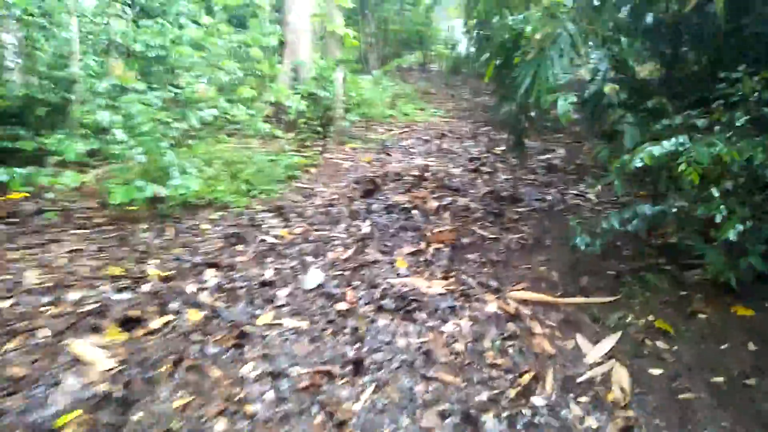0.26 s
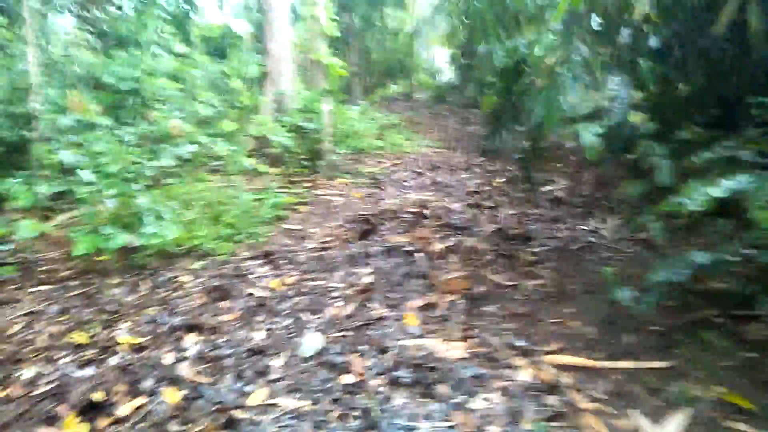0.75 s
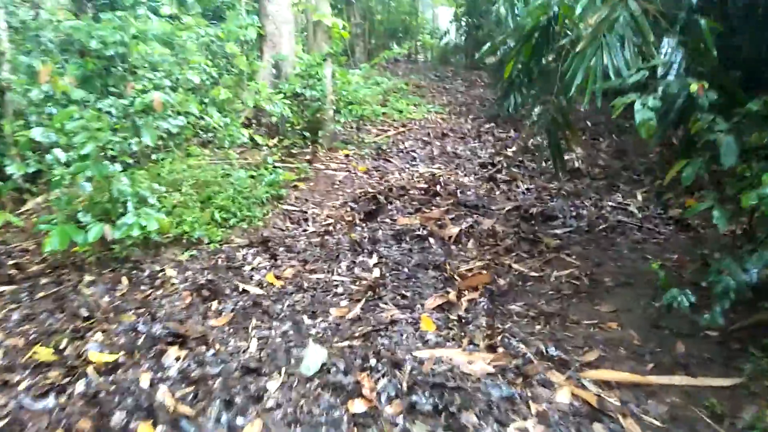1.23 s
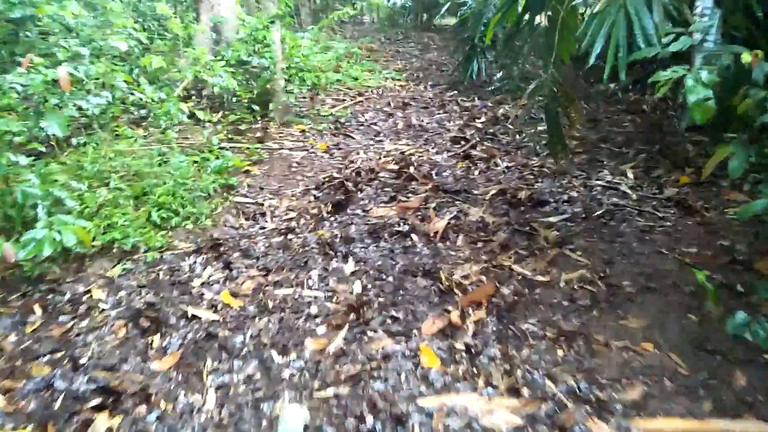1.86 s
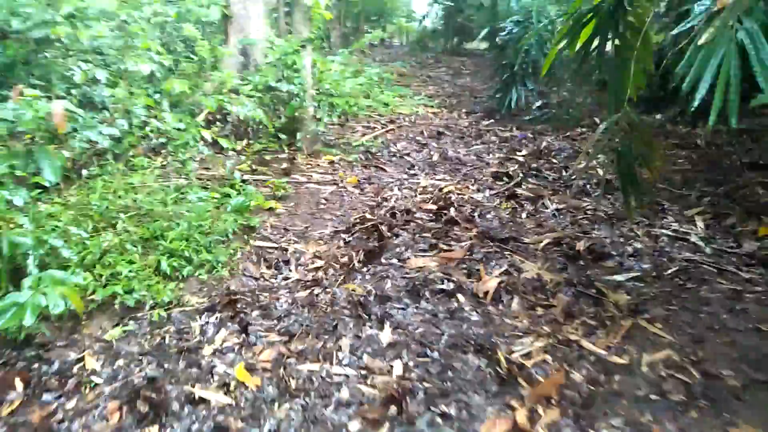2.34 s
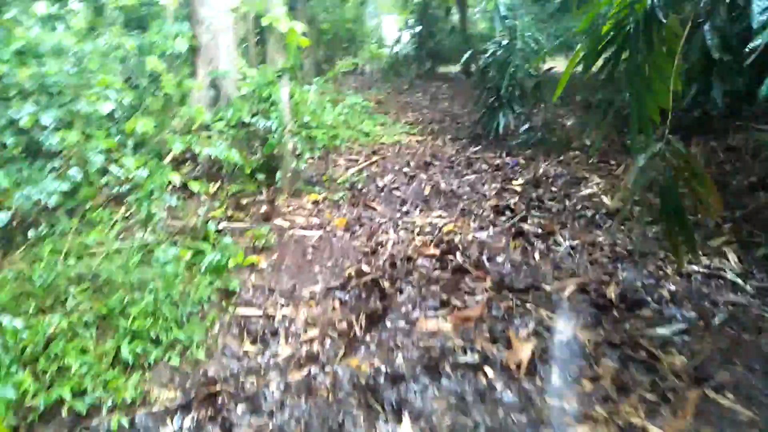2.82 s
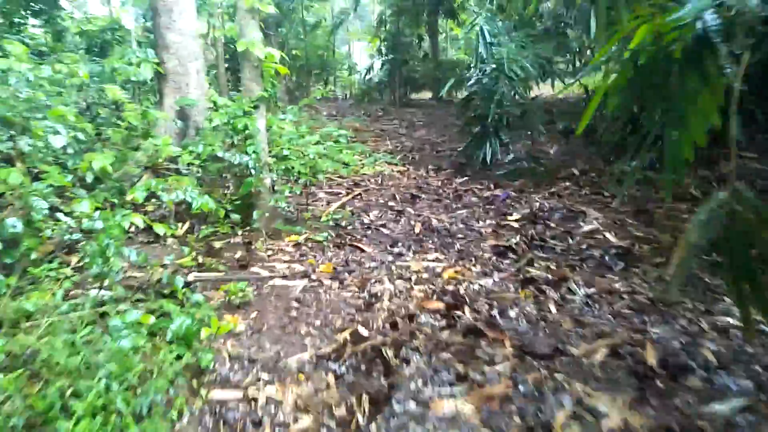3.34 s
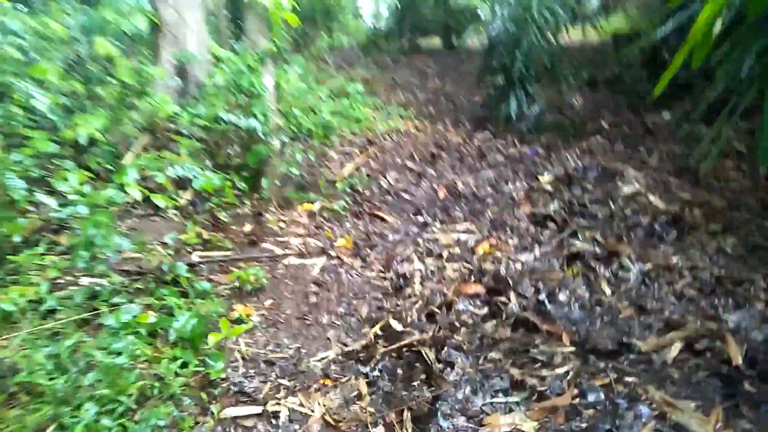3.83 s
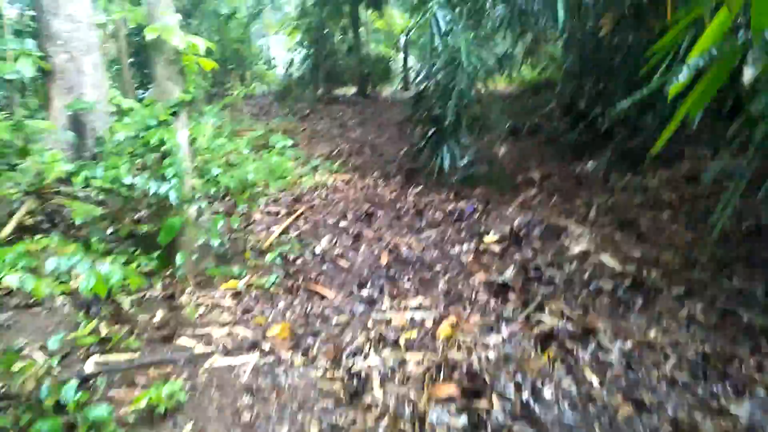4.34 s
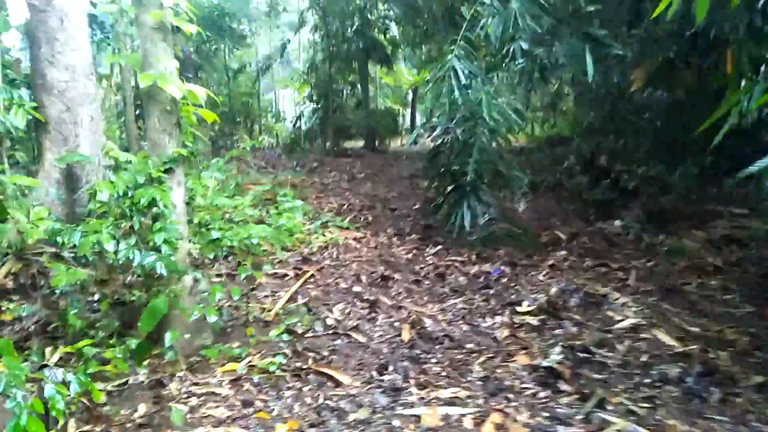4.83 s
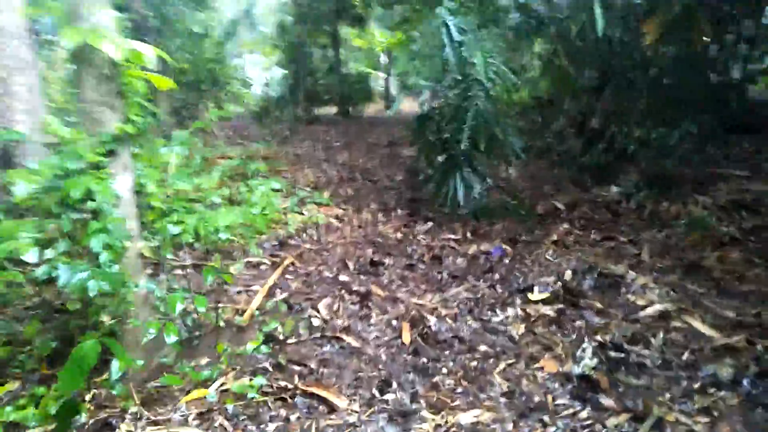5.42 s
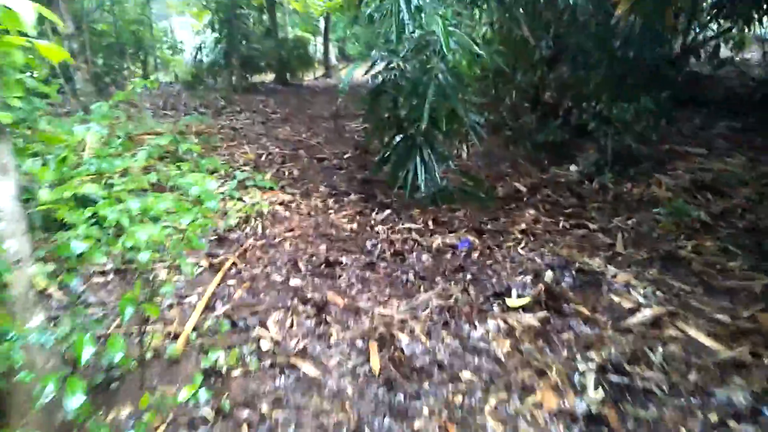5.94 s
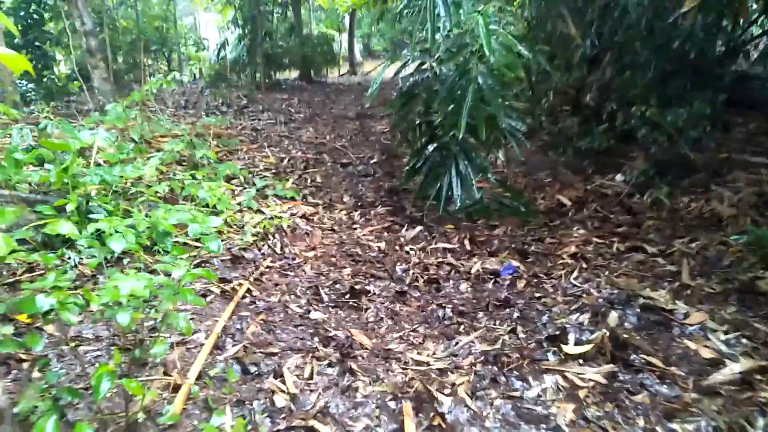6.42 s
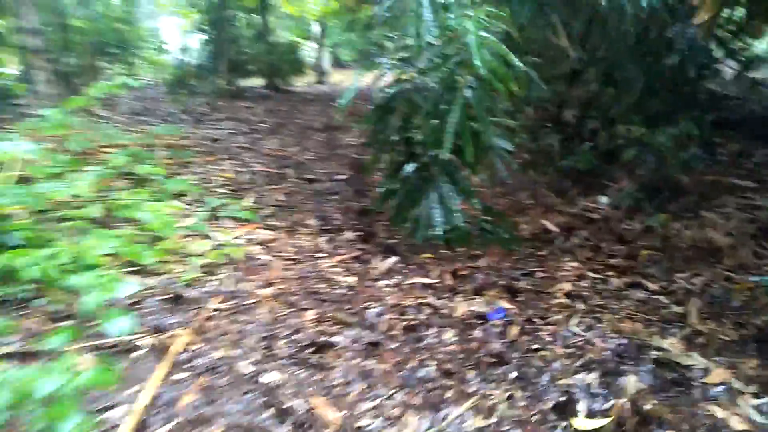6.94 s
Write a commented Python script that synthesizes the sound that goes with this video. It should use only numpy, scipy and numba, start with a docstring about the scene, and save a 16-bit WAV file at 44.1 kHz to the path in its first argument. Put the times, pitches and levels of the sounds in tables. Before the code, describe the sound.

Close, dense rain drips pop on stretched fabric above, crowded at first and sparser later, with crisp leaf snaps and soft rainfall around.

```python
"""A garden path in the rain, walked beneath a taut canopy close overhead, probably an umbrella.
Heavy drips from the trees each give a dull thud, a bright tick and a sharper crack, built from short
struck modes; their blows leave the canopy ringing as grainy noise through wandering resonances.
Fine drops patter between them as small random ticks. Rain hisses on the leaves all around as coloured
noise and tiny impacts, while the nearest leaves tap, snap and rustle."""
import sys
import numpy as np
from scipy import signal
from scipy.fft import rfft, irfft
from scipy.io import wavfile
from scipy.ndimage import uniform_filter1d, map_coordinates
from numba import njit

SR = 44100
rng = np.random.default_rng(int(sys.argv[2]) if len(sys.argv) > 2 else 0)


def materialize(psi):
    """Save the field psi as 16-bit PCM at rate SR to the path in sys.argv[1].

    A 1-D psi becomes a single channel; in a 2-D psi each row is a channel.
    """
    bounded = np.clip(np.atleast_2d(psi).T, -1, 1)
    quanta = np.round(bounded * 32767).astype(np.int16)
    wavfile.write(sys.argv[1], SR, quanta)


N = 316197

# heavy drips on the canopy: start_s, thud_hz, thud_db, tick_hz, tick_db, tick_ring_cycles, crack_db
HEAVY_DRIPS = [(0.2213, 225, -11, 2040, 4, 0.55, -6.5), (0.2373, 370, -66, 2950, -9, 0.84, -46),
               (0.311, 653, -31, 1800, -8, 1.13, -19), (0.4074, 553, -17.5, 1700, -0.5, 0.62, -29),
               (0.477, 900, -32, 2200, -12.5, 1.2, -24), (0.4996, 624, -21, 1820, 0.5, 0.57, -24),
               (0.5532, 565, -8.5, 1430, 3.5, 0.56, -3), (0.5731, 900, -18, 2100, -18, 0.79, -26),
               (0.614, 1030, -2, 2430, -5.5, 1.54, -23), (0.6644, 527, -18, 2190, -17, 3.9, -44),
               (0.7083, 760, -15, 2350, -13, 0.58, -34), (0.7913, 205, -23, 2840, -8, 0.43, -26),
               (0.9095, 950, -15, 1470, -25, 0.69, -26), (0.9145, 840, -10.5, 2850, -10.5, 0.6, -54),
               (0.9345, 784, -12, 1460, -10, 0.6, -9), (0.9844, 1320, -14, 2090, -9, 0.68, -43),
               (1.0347, 630, -13, 1750, -19, 0.85, -10.5), (1.138, 710, -14, 1790, -21, 1.5, -12),
               (1.2356, 900, -7.5, 1720, -4.5, 0.93, -17), (1.2567, 1030, -28, 2680, -10, 0.95, -12),
               (1.3418, 690, -7, 1250, -7.5, 0.6, -7.5), (1.376, 1180, -17, 2520, -10, 1.8, -26),
               (1.3863, 520, 1.5, 2400, -5, 0.56, -16), (1.4309, 640, -9.5, 2080, -6, 0.7, -10),
               (1.4604, 905, -11.5, 2170, -15, 3.1, -13), (1.4818, 770, -14, 1860, -4, 0.46, -18),
               (1.5078, 800, -29, 1980, -14, 1, -29), (1.5406, 493, -11.5, 1740, -18.5, 5.8, -38),
               (1.5914, 810, -11, 1640, 2.5, 0.53, -30), (1.6199, 1100, -47, 1800, -8, 1, -26.5),
               (1.6597, 1350, -8, 2410, -11, 0.89, -21.5), (1.6808, 1340, -30, 2220, -4, 0.81, -11),
               (1.6983, 800, -12, 1890, -18, 0.73, -14), (1.705, 596, -14.5, 2700, -12, 2, -20),
               (1.7187, 696, -10, 1780, -8.5, 1.6, -9), (1.7888, 635, -7, 1920, -1.5, 1.4, -35),
               (1.7961, 610, -22, 2480, -23, 1.5, -34), (1.8212, 620, -23, 2290, -20, 3.1, -12),
               (1.8746, 1310, -6.5, 2420, -8.5, 2.1, -36), (1.9197, 1340, -26, 2250, -17, 1.3, -30),
               (1.9598, 810, -21, 1930, -5.5, 1.1, -10), (1.9935, 695, -14.5, 1660, -5, 1.04, -14),
               (2.0112, 580, -12.5, 1700, -5, 0.77, -13), (2.0323, 805, -38, 2200, -34, 1, -19),
               (2.0447, 540, -26.5, 2530, -12.5, 1.8, -17), (2.1008, 670, -17.5, 1950, -11, 1.5, -32),
               (2.1124, 1270, -10, 2600, -10.5, 1.1, -6), (2.1365, 1100, -31, 1990, -10.5, 1.9, -18),
               (2.1463, 1360, -6, 1940, -15.5, 2.4, -16), (2.1835, 900, -38, 2110, -8, 0.8, -7),
               (2.1926, 600, -40, 1770, -5.5, 0.79, -14), (2.2156, 1340, -12, 1960, -4.5, 0.67, -11),
               (2.2434, 1120, -12, 1660, -9.5, 0.46, -30), (2.3126, 1350, -43, 2540, -3, 0.56, -36),
               (2.3649, 736, -35, 2320, -14.5, 2.6, -29), (2.4174, 900, -22, 2150, -7, 1.4, -9),
               (2.5203, 670, -17.5, 1780, -4.5, 0.58, -11), (2.5326, 630, -36, 2300, -11.5, 1.4, -14),
               (2.583, 900, -16, 2300, -9.5, 0.94, -24), (2.6015, 566, -20.5, 2400, -10, 1.3, -37),
               (2.6605, 497, -16.5, 2500, 0, 0.63, -34), (2.679, 720, -8.5, 1600, -0.5, 0.85, -36),
               (2.7407, 590, -6, 1890, -0.5, 1.03, -40), (2.8257, 820, -39, 2520, -5, 0.71, -40),
               (2.8705, 840, 1.5, 2170, -7, 2, -19), (2.8795, 393, -16, 1660, -7, 0.37, -28),
               (2.9043, 735, -9, 2100, -10.5, 2.5, -16), (2.916, 537, -7.5, 1210, -9, 0.68, -34),
               (2.9331, 800, -15, 1900, -19, 1, -42), (2.978, 1030, -10.5, 2350, -3.5, 0.7, -37),
               (2.9915, 980, -22, 2070, -5, 0.87, -32), (3.0635, 980, -22, 3180, -9.5, 1.5, -14),
               (3.1046, 1000, -13, 2500, -10, 1.1, -9), (3.1407, 910, -12.5, 2130, -11, 0.99, -25),
               (3.1465, 510, -10.5, 1670, 3, 0.92, -3), (3.1744, 890, -27, 2300, -24, 0.9, -32),
               (3.2007, 443, -29, 1680, -18, 2.2, -14), (3.2256, 716, -15.5, 1380, -8, 0.85, -30),
               (3.2638, 630, -4.5, 1480, 1, 0.78, -32), (3.4272, 554, -11.5, 1850, -4, 0.82, -10),
               (3.4484, 854, -14, 1970, -4.5, 0.62, -19), (3.5, 546, -17.5, 1900, -18, 2, -18),
               (3.5954, 283, -15.5, 2210, -9.5, 3.3, -55), (3.6853, 335, -10.5, 1890, -9.5, 1.3, -11.5),
               (3.71, 543, -19, 2260, -14.5, 1.7, -37), (3.77, 816, -22, 2290, -9.5, 1.65, -39),
               (3.8618, 650, -53, 1940, -11, 1.8, -26), (3.8965, 616, -5.0, 2310, -0.5, 0.5, -50),
               (4.0906, 474, -13, 1540, -5, 0.8, -41.5), (4.1244, 430, -5.5, 1350, 3, 0.57, -5),
               (4.1413, 590, -38, 1190, -17, 0.83, -39), (4.1534, 1340, -16, 2140, -23, 1.9, -33),
               (4.1895, 465, -6.5, 1850, 0.5, 1.1, -49), (4.269, 444, -14.5, 2350, -11, 1.66, -13),
               (4.4254, 710, -13, 1410, -12, 0.69, -30), (4.5439, 710, -18, 1640, -19, 2.5, -15),
               (4.6242, 434, -15, 2100, -11, 1.9, -37), (4.6977, 620, -21, 1630, -12, 1.07, -21),
               (4.7268, 1270, -18, 2000, -18, 1.2, -18), (4.8093, 630, -29, 1830, -8, 0.92, -15),
               (4.85, 623, -14, 1760, -32, 1.4, -17.5), (4.8608, 530, -15.5, 1450, -18, 0.77, -18),
               (4.8724, 402, -22.5, 1950, -28, 0.7, -25), (4.9289, 670, -17.5, 1510, -11, 1.37, -37),
               (4.9467, 1400, -12, 2300, -21.5, 5.6, -18), (5.0802, 760, -8.5, 1460, -14, 1.5, -25),
               (5.0988, 620, -18, 1290, -10, 0.43, -21), (5.1258, 950, -16, 2230, -9, 1.5, -29),
               (5.374, 407, -15.5, 1840, -69, 0.6, -26), (5.405, 650, -17.5, 2280, -50, 1.2, -39),
               (5.769, 1340, -48, 2730, 0, 0.46, -43), (5.824, 610, -16.5, 2460, -7.5, 1.3, -40),
               (5.8415, 690, -24, 2000, -4, 0.6, -40), (5.9023, 587, -18.5, 1900, -4.5, 1.1, -22),
               (5.9068, 470, -17.5, 1940, -6.5, 1.46, -11), (5.9295, 445, -13, 2000, -7, 0.99, -17),
               (5.9731, 610, -21, 2300, -12, 2.1, -14), (6.126, 780, -11.5, 1970, -5, 1.74, -7),
               (6.2201, 645, -8.5, 1390, -11, 0.84, -25), (6.2236, 504, -9.5, 1220, 1.5, 0.53, -12),
               (6.3071, 1350, -2.5, 2300, -10, 4, -24), (6.3601, 716, -20, 1440, -8, 1.1, -13),
               (6.443, 730, -21, 1860, -11, 1.3, -32), (6.4541, 1320, -10, 2770, -22, 7.4, -12.5),
               (6.6697, 330, -14, 2060, 2, 0.91, -5.5), (6.7285, 700, -40, 2290, -10, 1, -20),
               (6.7523, 313, -14, 3050, 2, 0.56, -45), (6.9901, 359, -6, 2370, -1, 2.2, -17),
               (7.0032, 560, -12.5, 2350, -13, 0.98, -33), (7.0204, 600, -16, 2100, -9, 0.8, -24),
               (7.0233, 398, -8.5, 2120, 4, 0.81, -19), (7.0532, 800, -22, 2190, -8, 0.58, -21),
               (7.0793, 430, -4, 1840, -1.5, 0.95, -25), (7.122, 602, -17.5, 1850, -20.5, 2.4, -29)]
# fine patter, thick under the tree crowns and thin in the gap between them: time_s, relative_level_db
PATTER_COVER = [(0.0, -37), (0.46, -34.5), (1.2, -36), (1.45, -31.5), (2.2, -35), (2.45, -34.5),
                (2.85, -34.5), (3.5, -38), (4.6, -41), (5.9, -38.5), (6.2, -32.5), (6.6, -34),
                (7.17, -37.5)]
# rain on the leaves; the bushes stand back in the middle of the path: time_s, relative_level_db
BUSH_COVER = [(0, -39), (1.1, -41.5), (1.5, -40), (2.1, -40), (2.8, -38), (3.3, -42), (3.9, -41),
              (4.5, -43.5), (5, -40.5), (5.8, -39.5), (6.3, -39), (7.17, -38.5)]
# each leaf and panel has its own tuning: typical drift as a share of the pitch
WANDER = 0.011


def undb(db):
    """Decibels to gain."""
    return 10 ** (np.asarray(db) / 20)


def unit(x):
    """Scale to rms 1."""
    return x / np.sqrt(np.mean(x ** 2))


def add(out, s, sound):
    """Mix a sound in at time s."""
    i = int(np.clip(s * SR, 0, N - 1))
    out[i:i + len(sound)] += sound[:len(out) - i]


def along(curve):
    """A (time_s, level_db) curve, sample by sample."""
    return np.interp(np.arange(N) / SR, *np.transpose(curve))


def colour(x, points):
    """Causal minimum-phase filter through (hz, db) points, built from the cepstrum."""
    size = 2048
    hz, db = np.transpose(points)
    bins_hz = np.arange(size // 2 + 1) * SR / size
    gain = undb(np.interp(np.log(bins_hz + 1), np.log(hz), db))
    cepstrum = irfft(np.log(gain))
    # fold the cepstrum forward in time
    cepstrum[1:size // 2] *= 2
    cepstrum[size // 2 + 1:] = 0
    return signal.fftconvolve(x, irfft(np.exp(rfft(cepstrum))))[:N]


def soften(x, hz):
    """Take the top off a sound with a low-pass."""
    return signal.sosfilt(signal.butter(4, min(hz, SR / 3), fs=SR, output="sos"), x)


def walk(rate):
    """Slow smooth chance of rms 1, with a new target about rate times a second."""
    k = int(SR / rate)
    steps = np.repeat(rng.standard_normal(N // k + 1), k)
    return unit(uniform_filter1d(steps, k)[:N])


def wander(x, rate):
    """Let all the resonances of a steady sound drift together by bending its playing speed."""
    place = np.cumsum(1 + WANDER * walk(rate))
    return map_coordinates(x, [place], order=3, mode="mirror")


def ping(hz, cycles, rise=0.11, size=500):
    """A struck mode: the push builds over part of a cycle, and the air follows the surface's speed."""
    turns = hz * np.arange(size) / SR
    swing = np.sin(2 * np.pi * turns) * np.exp(-turns / cycles) * (1 - np.exp(-turns / rise))
    return -np.diff(swing, prepend=0) / (2 * np.pi * hz / SR)


def impacts(rate, spread_db):
    """Random tiny impacts per second: many faint, a few strong, of either sign."""
    hit = rng.random(N) < rate / SR
    size = undb(spread_db * np.minimum(rng.exponential(size=N), 5))
    return unit(hit * size * rng.choice([-1, 1], N))


def bunch(hz, spread_s, count):
    """Dry little ticks of mixed pitch, starting most thickly at spread_s and none after twice that."""
    early, late, size, pitch = rng.random((count, 4)).T[:, :, None]
    steps = np.arange(260)
    tick_hz = np.minimum(hz * 2 ** (1.4 * pitch - .7), SR / 3)
    turns = tick_hz * steps / SR
    swing = np.sin(2 * np.pi * turns) * np.exp(-turns) * (1 - np.exp(-turns / 0.21))
    ticks = size * np.diff(swing, prepend=0) / (np.pi * turns[:, 1:2])
    start = (spread_s * SR * (early + late)).astype(int)
    return np.bincount((start + steps).ravel(), ticks.ravel())


def small_drops(rate, low_hz, high_hz, spread_db, cycles=1.07):
    """Random small drops, each a dry damped tick of its own pitch; also their (time_s, level_db)."""
    when, pitch, size, damping = rng.random((int(rate * N / SR), 4)).T[:, :, None]
    db = -spread_db * np.log(size + .03)  # many faint, a few strong
    steps = np.arange(400)
    turns = low_hz * (high_hz / low_hz) ** pitch * steps / SR
    decay = np.exp(-turns / (cycles * (.5 + .5 * damping)))
    swing = np.sin(2 * np.pi * turns) * turns * decay
    ticks = undb(db) * np.diff(swing, prepend=0) / turns[:, 1:2]
    start = (when * N).astype(int)
    out = np.bincount((start + steps).ravel(), ticks.ravel(), N)[:N]
    return unit(out), np.hstack([when * N / SR, db])


def rainfall(spectrum, rate, spread_db, wash_db, flicker_db):
    """Countless drops on foliage: near ones crackle, far ones merge into a wash."""
    drops = impacts(rate, spread_db) + undb(wash_db) * rng.standard_normal(N)
    return unit(colour(drops, spectrum)) * undb(flicker_db * walk(25))


def leaf_hiss(db=4):
    """Rain on the leaves all around: a mostly merged wash whose leafy resonances drift."""
    # colour of rain on the leaves: pitch_hz, relative_density_db (per Hz)
    leaf_spectrum = [(150, 0), (400, -12.5), (600, -5.5), (950, -9.5), (1900, -7.5), (2400, 6), (2620, -2),
                     (2860, 4.5), (3150, -11), (3500, -3), (3850, 2), (4080, -5), (4600, 5), (5200, 2.5),
                     (6500, -10.5), (12000, -16.5)]
    rain = rainfall(leaf_spectrum, rate=1200, spread_db=4.0, wash_db=8.5, flicker_db=0.01)
    return undb(db + along(BUSH_COVER)) * wander(rain, rate=5)


def spray_hiss():
    """The finest spray: dense treble impacts and noise with a fast flicker in level."""
    # colour of the spray: pitch_hz, relative_density_db (per Hz)
    spray_spectrum = [(3000, -63), (6000, -14), (8500, 2.5), (10200, -19), (11600, 4), (13000, -10),
                      (15800, -7)]
    # it carries least far, so it fades most where the bushes stand back: time_s, level_db
    spray_cover = [(0, -46.5), (0.7, -48), (0.9, -45.5), (1.25, -47.5), (1.5, -44.5), (2.0, -46),
                   (2.9, -47), (3.3, -48), (3.9, -49.5), (4.4, -50), (5.0, -48), (5.35, -47.5),
                   (5.55, -44.5), (6.3, -48.5), (7.17, -44.5)]
    spray = rainfall(spray_spectrum, rate=3200, spread_db=7.0, wash_db=0.0, flicker_db=1.4)
    return undb(along(spray_cover)) * spray


def air(corner_hz=135, db=-55.0, swell_db=3.6):
    """Faint low rumble of air moving past the microphone: slowly swelling band-limited noise."""
    band = signal.butter(2, [45, corner_hz], "band", fs=SR, output="sos")
    low = signal.sosfilt(band, rng.standard_normal(N))
    return unit(low) * undb(db + swell_db * walk(1.3))


@njit
def resonate(x, hz, width):
    """A band-pass resonance (state-variable filter) whose centre moves from sample to sample."""
    y, band, low = np.empty(len(x)), 0., 0.
    for i in range(len(x)):
        g, k = np.tan(np.pi * hz[i] / SR), width / hz[i]
        v = (band + g * (x[i] - low)) / (1 + g * (g + k))
        band, low, y[i] = 2 * v - band, low + 2 * g * v, k * v
    return y


def canopy(kicks, t60, scatter_db, low_hz=380, high_hz=4600):
    """The canopy rings after (time_s, level_db) kicks, each shared differently among its resonances."""
    # canopy resonances: pitch_hz, width_hz, relative_level_db
    resonances = [(600, 153, -1), (1275, 310, 0), (1535, 77, 2.5), (1866, 45, 3.5), (2271, 85, 9.5),
                  (2460, 41, 4.5), (2848, 42, -4), (3326, 27, -8), (3500, 190, -11.5)]
    patchy_db = 1.9  # typical swell and fade of each resonance
    crunch_db, crunch_width = -5.5, 0.23  # level against the ring; width as a share of the pitch
    s, db = np.transpose(kicks)
    where = np.clip(s * SR, 0, N - 1).astype(int)
    # each kick lands elsewhere
    chance = 2 * rng.random((len(s), len(resonances))) - 1
    shares = undb(np.transpose(resonances)[2] + scatter_db * chance)
    shares = shares / np.linalg.norm(shares, axis=1, keepdims=True)
    # scattered water keeps the ring grainy; the larger droplets also crunch dryly on the fabric
    grain = impacts(rate=1100, spread_db=2.5)
    droplets = impacts(rate=170, spread_db=0.5)
    fade = np.exp(-2 * np.log(1000) / (t60 * SR))
    out = 0
    for (hz, width, _), share in zip(resonances, shares.T):
        power = np.bincount(where, (undb(db) * share) ** 2, N)
        energy = signal.lfilter([1], [1, -fade], power + 1e-18)
        centre = hz * (1 + WANDER * walk(3.6))
        ring = unit(resonate(grain, centre, float(width)) * undb(patchy_db * walk(3)))
        crunch = unit(resonate(droplets * rng.standard_normal(N), centre, float(crunch_width * hz)))
        # neighbouring modes swing against each other
        out = np.sqrt(energy) * (ring + undb(crunch_db) * crunch) - out
    return signal.sosfilt(signal.butter(3, [low_hz, high_hz], "band", fs=SR, output="sos"), out)


def patter(tick_db=-4.0, ring_db=-2.0):
    """Fine drops on the canopy, and the ring they keep alive."""
    ticks, kicks = small_drops(rate=240, low_hz=1247, high_hz=3400, spread_db=5.0)
    return undb(tick_db) * ticks + undb(ring_db) * unit(canopy(kicks, t60=0.18, scatter_db=5.5))


def leaf_crackle(db=-8):
    """Many fine, separate ticks from the bushes along the path."""
    ticks, _ = small_drops(rate=440, low_hz=1900, high_hz=5050, spread_db=4.5, cycles=2.5)
    return undb(db + along(BUSH_COVER)) * soften(ticks, hz=5900)


def leaf_taps(rate=24, low_hz=3000, high_hz=5200, cycles=5.6, db=-31, spread_db=5):
    """Single drops on stiff wet leaves close by, each a dry tick of its own pitch."""
    out = np.zeros(N)
    for when, pitch, size in rng.random((int(rate * N / SR), 3)):
        tap_db = db + spread_db * (2 * size - 2.5)  # half to two and a half spreads below db
        add(out, when * N / SR, undb(tap_db) * ping(low_hz * (high_hz / low_hz) ** pitch, cycles))
    return out


def litter_drops(db=-58):
    """Sparse low ticks of drops on the litter below."""
    ticks, _ = small_drops(rate=34, low_hz=464, high_hz=1700, spread_db=7.0)
    return undb(db) * ticks


def light_drips(rate=15, thud_hz=900, tick_hz=2150, thud_db=5, tick_db=18, crack_db=8,
                thud_octaves=0.65, tick_octaves=0.22, tick_cycles=0.74, scatter_db=4):
    """Lighter drips at random moments, as rows like HEAVY_DRIPS; levels follow the patter's cover."""
    when, *chance = rng.random((int(rate * N / SR), 6)).T
    thud_pitch, thud_size, tick_pitch, tick_size, crack_size = 2 * np.array(chance) - 1
    s = when * N / SR
    cover_db = np.interp(s, *np.transpose(PATTER_COVER))
    return np.column_stack([
        s,
        thud_hz * 2 ** (thud_octaves * thud_pitch), cover_db + thud_db + scatter_db * thud_size,
        tick_hz * 2 ** (tick_octaves * tick_pitch), cover_db + tick_db + scatter_db * tick_size,
        np.full(len(s), tick_cycles), cover_db + crack_db + scatter_db * crack_size])


def spatters(db=-4):
    """Drops that shatter on nearby leaves, each a short rustle of droplets."""
    # bright spatters and crunches: start_s, relative_level_db, pitch_hz, time_to_thickest_s
    leaf_bursts = [(0.2, -29, 4600, .008), (0.62, -30, 3900, 0.0053), (0.7783, -19.5, 5060, 0.0066),
                   (0.894, -25, 1490, .016), (0.93, -26, 1680, 0.018), (0.977, -23.5, 1990, .01),
                   (1.225, -29, 1800, 0.0069), (1.481, -20, 5500, 0.0082), (2.104, -28, 4660, 0.0059),
                   (2.131, -22.5, 1880, .008), (2.161, -19.5, 6200, 0.0094), (2.304, -22, 3750, .008),
                   (2.517, -27, 4440, .007), (2.55, -26, 4900, 0.0053), (2.662, -27, 4000, 0.0072),
                   (3.167, -26, 3600, 0.0089), (3.419, -53, 1680, .016), (3.569, -25, 3870, 0.0075),
                   (4.537, -25, 2110, .008), (4.843, -41, 1300, 0.0093), (5.759, -25, 3520, 0.0092),
                   (5.893, -36, 2050, .008), (6.212, -24.5, 1410, 0.0068), (6.276, -28, 6400, 0.0068),
                   (6.507, -17.5, 4400, 0.011), (6.527, -30, 3850, .007), (6.6846, -19, 4340, 0.0097),
                   (6.721, -24.5, 3580, 0.0087)]
    out = np.zeros(N)
    for s, level_db, hz, spread_s in leaf_bursts:
        add(out, s, undb(db + level_db) * bunch(hz, spread_s, count=40))
    return out


def satellites(rows, lead_s=.011, spread_s=.012, db=-25.0, follow=0.72):
    """A drip leaves its leaf with a train of droplets that land just before and after it."""
    out = np.zeros(N)
    for s, _, _, tick_hz, tick_db, *_ in rows:
        add(out, s - lead_s, undb(db + follow * tick_db) * bunch(tick_hz, spread_s, count=20))
    return out


def snaps(cycles=4.5, rise=0.39, splash_db=-17, splash_s=0.0046):
    """Single drops snap on stiff leaves close by: a few cycles of ring, then a little splash."""
    # snapping drops: start_s, level_db, pitch_hz
    leaf_snaps = [(0.218, -23, 11900), (0.9079, -52, 12900), (0.9427, -26, 3830), (1.0337, -17.5, 6700),
                  (1.0356, -29, 12600), (1.2361, -18.5, 4580), (1.478, -26, 4860), (1.6617, -31, 12600),
                  (2.363, -21, 11900), (2.5015, -14.5, 4690), (3.1484, -15, 6100), (3.263, -19.5, 4740),
                  (3.4854, -18.5, 7700), (3.593, -20.5, 4020), (3.6746, -18.5, 7280), (3.8953, -26, 4560),
                  (5.4985, -23, 12880), (5.7694, -26, 12830), (6.0723, -20, 11900), (6.2418, -22, 11890),
                  (6.2817, -15, 7700), (6.5157, -20, 7500), (6.532, -18.5, 3700), (6.9906, -14, 6115),
                  (7.0795, -14, 6300)]
    out = np.zeros(N)
    for s, db, hz in leaf_snaps:
        add(out, s, undb(db) * ping(hz, cycles, rise))
        add(out, s, undb(db + splash_db) * bunch(hz, splash_s, count=10))
    return out


def blow_db(thud_db, tick_db):
    """Strength of a drip: thud and tick together."""
    return 20 * np.log10(np.hypot(undb(thud_db), undb(tick_db)))


def drips(rows, thud_cycles=0.38, tick_rise=0.4, crack_hz=4400, crack_cycles=1.6, crack_rise=0.94,
          ring_t60=0.36, splash_s=0.0016, splash_db=-11.0, body_ratio=0.75, body_s=0.031, body_db=-15.0):
    """Each drip: thud, tick and crack in one blow, a brief splash, then the ring of the canopy."""
    ring_db, ring_follow = -35, 0.43  # kick after a 0 dB blow; dB of kick per dB of blow
    blows = np.zeros(N)
    t = np.arange(SR // 8) / SR
    kicks = []
    for s, thud_hz, thud_db, tick_hz, tick_db, tick_cycles, crack_db in rows:
        grit, sway = rng.standard_normal((2, len(t)))
        thud = undb(thud_db) * ping(thud_hz, thud_cycles)
        tick = undb(tick_db) * ping(tick_hz, tick_cycles, tick_rise)
        crack = undb(crack_db) * ping(crack_hz, crack_cycles, crack_rise)
        blow = thud + tick + crack
        add(blows, s, blow)
        # the drop bursts and repeats the blow in miniature
        splash = grit * np.abs(grit) * t * np.exp(-t / splash_s)
        splash /= np.linalg.norm(splash)
        add(blows, s, undb(splash_db) * signal.fftconvolve(blow, splash))
        # the fabric goes on swinging below the pitch of the thud
        body = sway * np.exp(-t / body_s)
        body /= np.linalg.norm(body)
        swing = signal.fftconvolve(ping(body_ratio * thud_hz, 0.49), body)
        add(blows, s, undb(thud_db + body_db) * swing)
        # a harder drip leaves more ring
        kicks.append((s, ring_db + ring_follow * blow_db(thud_db, tick_db)))
    return blows + canopy(kicks, t60=ring_t60, scatter_db=10.5)


def showers(db=-37.5, decay_s=0.0063, follow=0.2):
    """Gain of the short shower of fine drops that each heavy drip shakes loose and that dies away."""
    s, _, thud_db, _, tick_db, *_ = np.transpose(HEAVY_DRIPS)
    shower_db = db + follow * blow_db(thud_db, tick_db)
    power = np.bincount((s * SR).astype(int), undb(shower_db) ** 2, N)
    return np.sqrt(signal.lfilter([1], [1, -np.exp(-2 / (decay_s * SR))], power + 1e-18))


def frame(hz=125, cycles=2.1, db=-25):
    """One very heavy drip also shakes the canopy's frame, a single low ping."""
    out = np.zeros(N)
    add(out, 1.386, undb(db) * ping(hz, cycles, size=6000))
    return out


def scene(patter_db=-3.5):
    """Drips and patter overhead, rain all around, drops on the nearest leaves and the litter below."""
    hiss = leaf_hiss() + spray_hiss()
    fine_drops = np.hypot(undb(patter_db + along(PATTER_COVER)), showers()) * patter()
    rows = np.vstack([HEAVY_DRIPS, light_drips()])
    overhead = drips(rows) + frame() + soften(satellites(rows) + fine_drops, hz=6100)
    foliage = leaf_crackle() + leaf_taps() + snaps() + spatters()
    return (overhead + hiss + litter_drops() + foliage + air())[None]


def suppress(x, depth_db, threshold_db, knee_db, hold_s):
    """Noise suppressor: each narrow band is turned down while it stays near its own usual level."""
    size, hop = 1024, 256
    _, _, spectrum = signal.stft(x, nperseg=size, noverlap=size - hop)
    keep = np.exp(-hop / (hold_s * SR))
    power = signal.lfilter([1 - keep], [1, -keep], np.abs(spectrum) ** 2)
    db = 10 * np.log10(power + 1e-18)
    usual = uniform_filter1d(np.median(db, axis=1), size=9)[:, None]
    shut = (1 - np.tanh((db - usual - threshold_db) / (2 * knee_db))) / 2
    return signal.istft(spectrum * undb(-depth_db * shut), nperseg=size, noverlap=size - hop)[1][:N]


def record(dry, ceiling=0.98, top_hz=15900):
    """Colour the sound, suppress steady noise, round the hardest taps and cut the top."""
    # microphone colour, with a deep hollow between two port resonances: pitch_hz, gain_db
    mic_colour = [(40, -5), (150, -5), (300, 1), (2300, -0.5), (2930, 6), (3120, -0.5), (3320, -1),
                  (3650, -2.5), (3900, 1.5), (4200, 2.5), (4800, 0.5), (5250, -1.5), (5500, -7.5),
                  (5850, -8), (6300, -14.5), (10700, -11.5), (11700, -0.5), (12750, 7.5), (12950, 12),
                  (13200, 5), (14200, 1), (15800, -9.5)]
    x = colour(dry[0], mic_colour)
    x = suppress(x, depth_db=12.5, threshold_db=2.0, knee_db=1.5, hold_s=0.03) / ceiling
    x = ceiling * x / (1 + x ** 4) ** (1 / 4)
    return signal.sosfilt(signal.ellip(8, .2, 70, top_hz, fs=SR, output="sos"), x)[None]


dry = scene()
out = record(dry)
materialize(out)
```